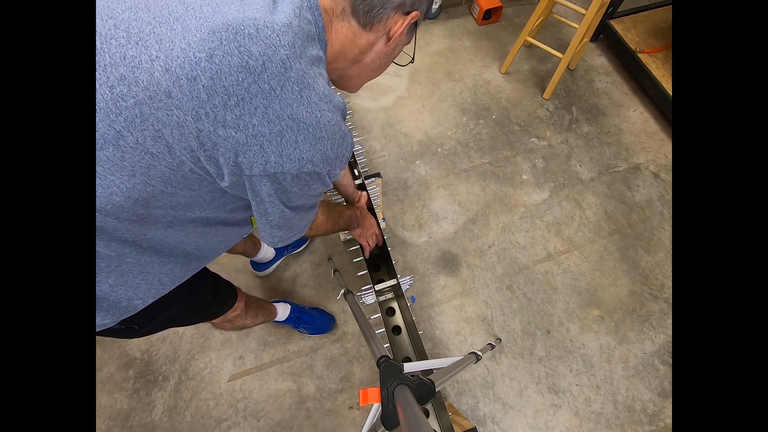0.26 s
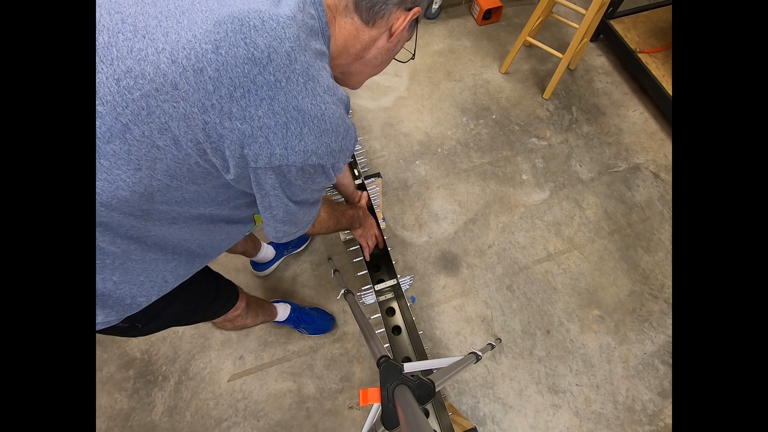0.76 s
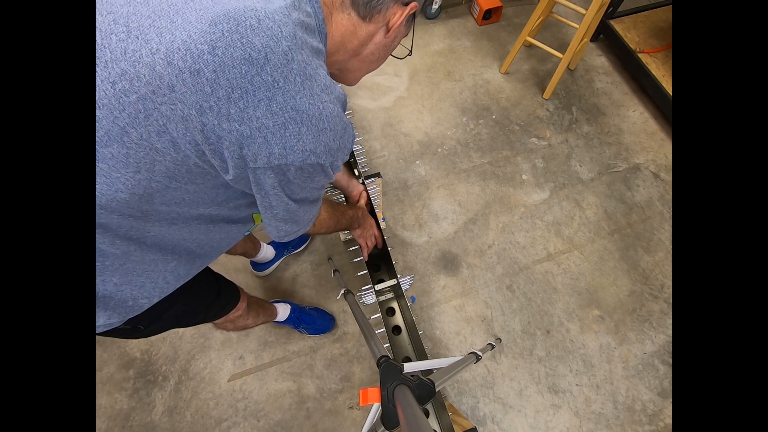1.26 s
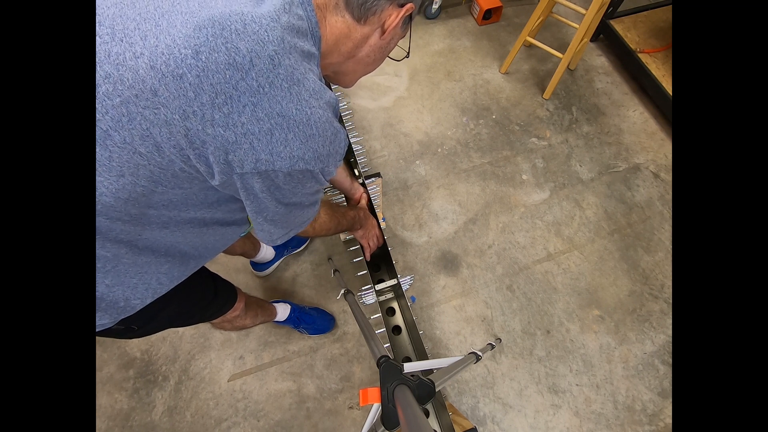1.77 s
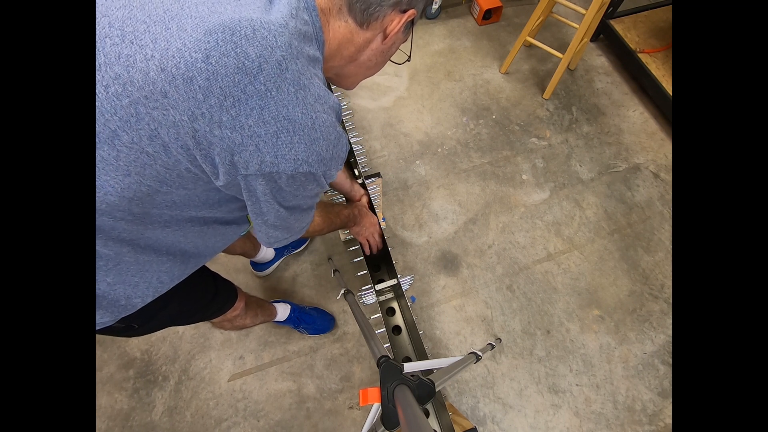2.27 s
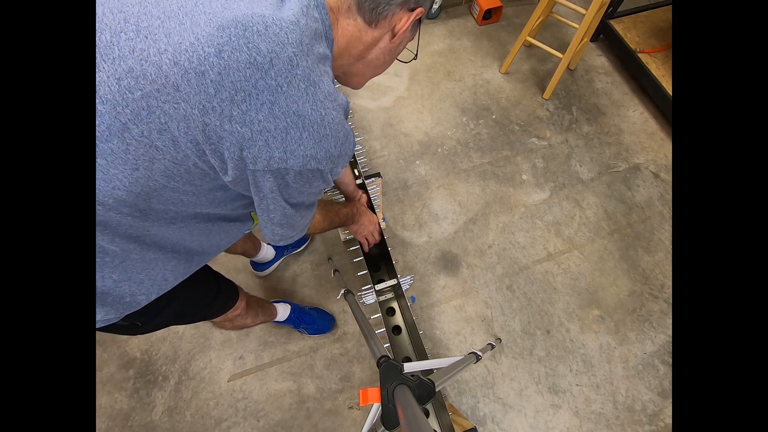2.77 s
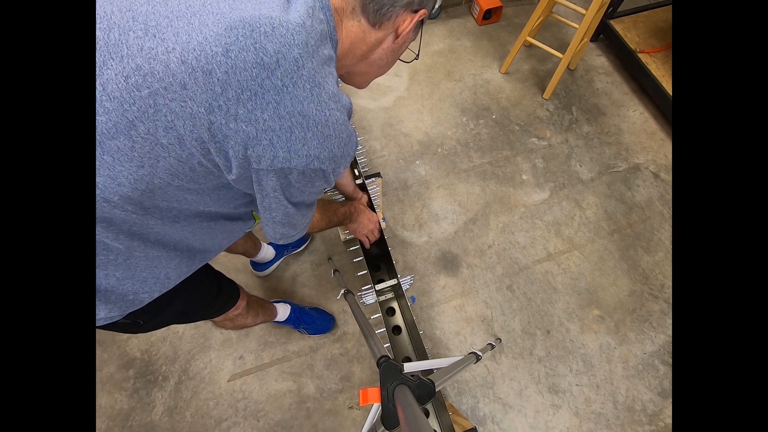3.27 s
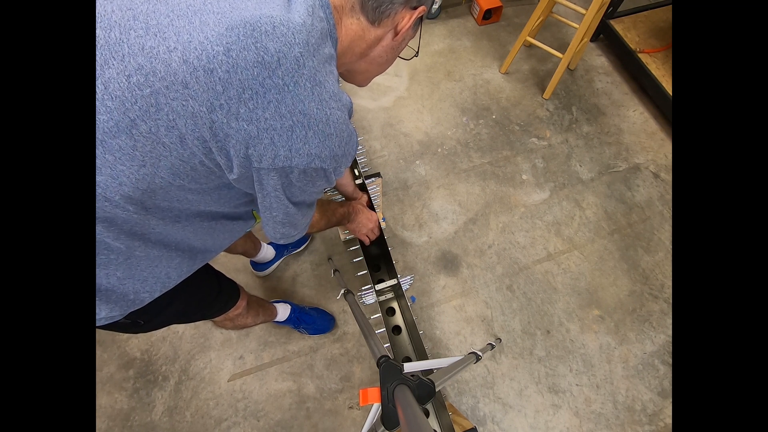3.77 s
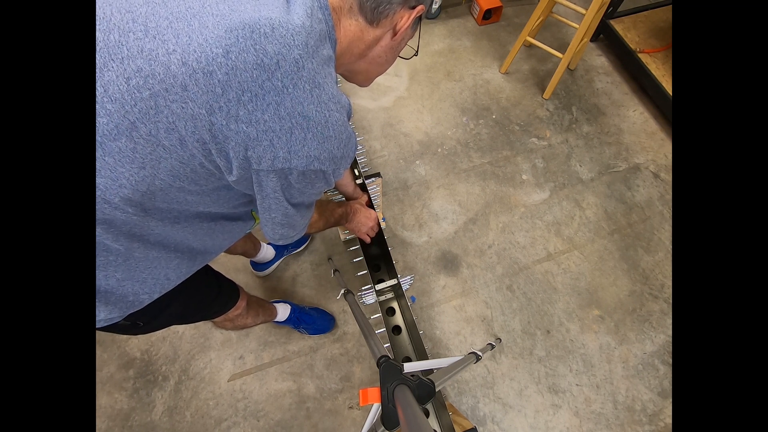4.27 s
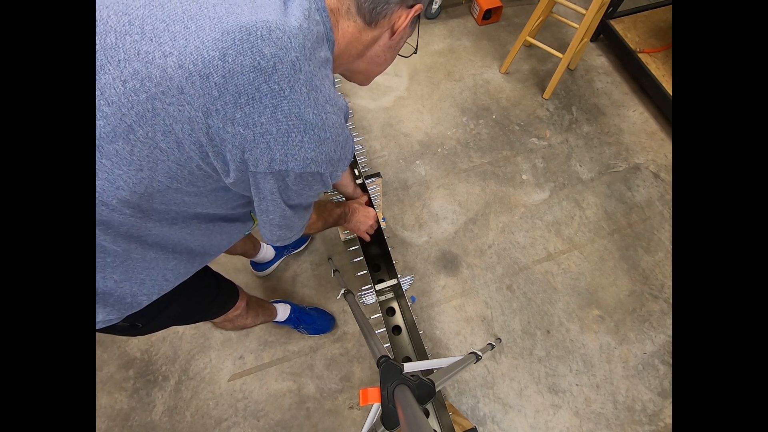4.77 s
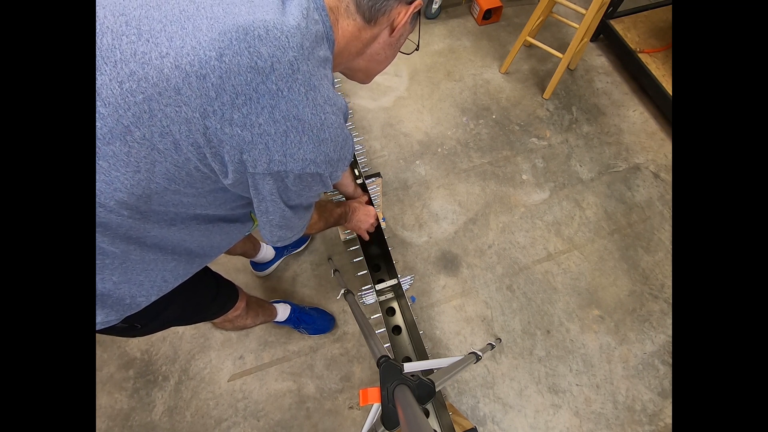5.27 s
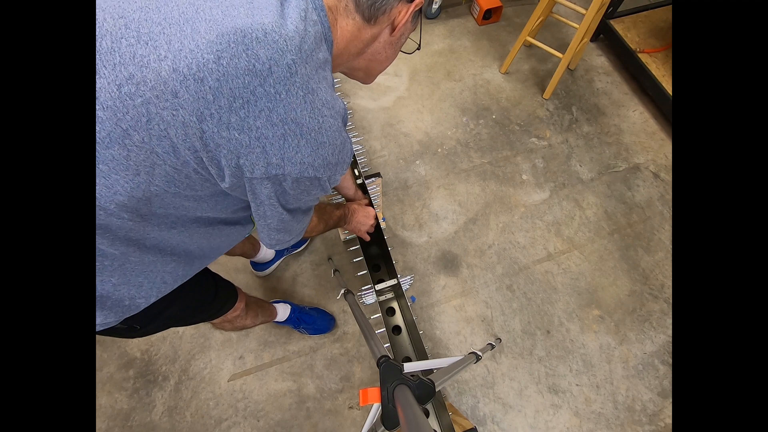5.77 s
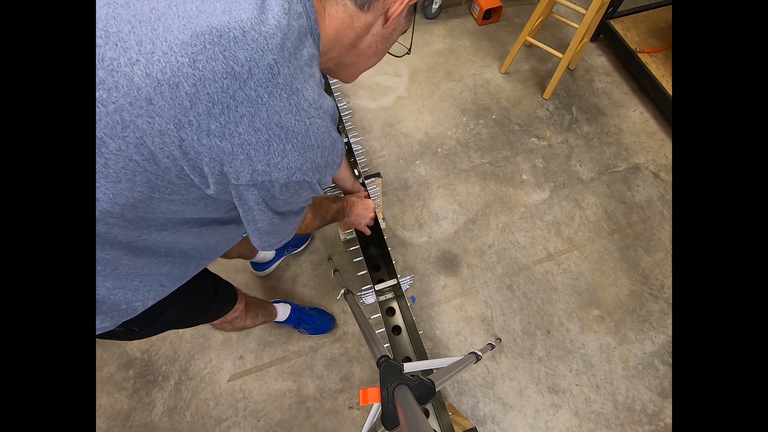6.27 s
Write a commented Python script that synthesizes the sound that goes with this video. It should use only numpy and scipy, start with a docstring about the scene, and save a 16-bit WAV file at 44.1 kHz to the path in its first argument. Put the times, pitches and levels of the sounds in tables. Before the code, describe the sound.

A ventilation fan blows softly throughout, low airy noise with a faint steady hum, in a hard-floored workshop with a short half-second tail. Quiet finger shuffling opens the scene; a barely audible knock and sleeve rustle come at 1.1 seconds. At 1.35 a bright, sharp crack snaps and the aluminium frame answers with a brief hollow thud. A small dry tick follows at 1.9. At 2.54 comes a duller, woodier metallic clack, then a tiny high steel ping at 2.63 and fainter ones near 2.77. From 2.8 to 4 seconds there are soft knocks and fumbling, then near quiet with light handling. At 5.56, two faint bursts lead within milliseconds into the loudest snap, heavy and mid-toned; the background dips slightly afterwards and recovers. Small clicks follow at 5.67 and 5.85, then soft rattles and cloth rustle from 6.2 to the end.

```python
"""A hand riveter worked on a long aluminium frame gives three sharp snaps and some soft knocks: dying
noise rattles that excite the frame's modes and a diffuse tail in a concrete-floored workshop.
Two faint noise bursts come just before the loudest snap; gain control dips the level after it, then recovers.
Small steel parts ping as resonators under tiny contacts; hands shuffle and sleeves rustle as swelling noise.
A ventilation fan hums below as coloured air noise and narrow resonances."""
import sys
import numpy as np
from scipy import signal
from scipy.io import wavfile

SR = 44100
rng = np.random.default_rng(int(sys.argv[2]) if len(sys.argv) > 2 else 0)


def transcribe(signal):
    """Save signal, clipped to [-1, 1], as a 16-bit WAV file at the path in sys.argv[1]."""
    frames = np.atleast_2d(signal).T
    limited = np.clip(frames, -1, 1)
    pcm = np.round(limited * 32767).astype(np.int16)
    wavfile.write(sys.argv[1], SR, pcm)


N = 287973

# Ventilation air noise, spectral density: hz, level_db (per Hz, relative)
FAN_AIR = [(25, -8), (60, -9.5), (130, -8.5), (200, -2.5), (350, -8.5), (530, -8), (740, -9), (950, -11.5),
           (1560, -11), (2900, -18.5), (3600, -28.5), (6000, -28.5), (9500, -46), (12000, -35)]
# Motor lines of the fan: hz, width_hz, level_db
FAN_LINES = [(234, 3.5, -68.5), (347.4, 14, -65), (617, 8.6, -75.5), (726, 10, -74.5), (1425, 12, -79),
             (5650, 150, -94.5), (9350, 8, -96.5)]
# Hand movements: start_s, hold_s, shuffle_db, rustle_db
MOVES = [(0, .01, -60, -84), (1.101, 0.053, -66.5, -62), (1.354, .02, -59, -60), (1.451, 0.4, -61, -78.5),
         (2.375, .05, -65, -71.5), (2.47, 0.025, -53.5, -71.5), (2.7, 0.13, -51.5, -76),
         (3.18, .13, -58.5, -86), (3.75, .05, -64, -84), (3.91, 0.044, -48, -91),
         (4.604, .15, -65.5, -83.5), (5.14, 0.19, -61.5, -89.5), (5.4, .03, -53, -75),
         (5.5, 0.47, -59, -74), (6.182, 0.16, -63.5, -62.5), (6.39, .03, -55.5, -63.5),
         (6.5, .05, -64, -57.5)]
# Low frame resonances under the fingers: hz, width_hz, level_db (relative)
SHUFFLE_MODES = [(152.3, 153.7, -12), (194, 50, -9), (241, 44, -8.5), (365, 29, 5), (492, 140, 1),
                 (763, 220, -10), (1270, 500, -10.5)]
# Cloth and skin noise, spectral density: hz, level_db (per Hz, relative)
RUSTLE_COLOUR = [(710, -29.5), (1200, -8), (1260, -9.5), (1770, 1), (2030, -9), (2880, -3), (9000, -13),
                 (14000, -36)]
# Contacts of small steel parts: start_s, level_db, fade_s (amplitude falls by e)
PINGS = [(0.695, -76, 0.0069), (2.631, -42.5, 0.015), (2.761, -62, 0.028), (2.772, -64, 0.034)]
# Modes of the steel parts: hz, level_db (relative), t60_s
STEEL_MODES = [(4340, -11, .2), (4390, -7.5, .08), (6700, -14, .05)]
# Snaps, knocks, ticks, and two faint noise bursts just before the loudest snap:
# start_s, thud_db, knock_db, knock_hz (centre), crack_db, crack_hz (centre),
# crack_fall_db (per octave above centre), rattle_s (amplitude falls by e), first_contact_db (over the rattle)
BURSTS = [(1.08, -60, -53, 450, -65, 3780, 18, 0.025, -12.5),
          (1.355, -33, -30, 330, -18.5, 4770, 19, 0.011, 2),
          (1.88, -73, -68, 400, -53.5, 2850, 12.5, 0.0027, 3.5),
          (2.539, -56, -31.5, 360, -31, 1970, 6, .013, -9),
          (2.839, -65.5, -56, 450, -65, 2200, 8.5, 0.012, -3),
          (3.342, -76.5, -54.5, 380, -87.5, 3000, 6.5, 0.0083, -15),
          (3.454, -68.5, -51, 450, -71, 1800, 10, .016, -12),
          (3.739, -75.5, -67.5, 600, -71.5, 6040, 15, 0.0047, 0.5),
          (3.852, -63, -53.5, 600, -78, 2500, 12.5, 0.069, -7.5),
          (3.935, -67, -53.5, 360, -82, 2500, 11, 0.0091, -15),
          (5.541, -69, -44, 800, -64, 5000, 3, 0.0087, -2),
          (5.552, -52.5, -33.5, 750, -49.5, 5000, -2, 0.014, -2),
          (5.564, -23, -20, 800, -24, 2400, 4.5, 0.0073, 14),
          (5.67, -55, -41, 900, -39.5, 3000, 10.5, 0.035, -9),
          (5.85, -58, -50, 600, -44, 5070, 3.5, 0.006, -9),
          (6.177, -52.5, -52.5, 850, -64, 2820, 22, 0.037, -5.5),
          (6.215, -46.5, -56, 500, -80, 5500, 9, 0.026, -7),
          (6.394, -63, -58.5, 340, -65.5, 8100, -3, 0.037, -16)]
# Colour of the low thud: hz, level_db (relative)
THUD_COLOUR = [(50, -15.5), (130, -0.5), (220, -3.5), (400, -14), (900, -30.5), (9000, -68.5)]
# Modes of the aluminium frame: hz, level_db (relative), t60_s
FRAME_MODES = [(74, 0, .5), (170.4, -27, .3), (220.4, -15.5, 0.14), (325, 0, 0.35), (498.4, -23.5, 0.12),
               (561, -5, 0.26), (750, -16.5, 0.36), (853, -2.5, .3), (898, -6, 0.26), (1074, -20.5, 1),
               (1194, -5, 0.38), (1700, -5, .12), (1800, -6, .15)]
# Reverberation time of the workshop: hz, t60_s
ROOM_T60 = [(100, 0.45), (260, 0.5), (700, 0.53), (1840, 0.41), (4850, 0.25), (12800, 0.39)]
# Stereo balance: hz, left_minus_right_db
BALANCE_DB = [(350, 0), (1000, -2), (2000, -2), (4000, -1)]
# Left-right correlation of far noise: hz, correlation
FAR_ALIKE = [(60, .6), (180, 0.55), (550, 0.2), (1650, 0.35), (5000, 0.54), (12000, 0.086)]
# Left-right correlation of the bursts and their tail: hz, correlation
TAIL_ALIKE = [(60, .96), (250, .98), (500, .7), (1000, .45), (2500, .55), (8000, .35)]
EDGES_HZ = 25 * 2 ** (np.arange(29) / 3)   # third-octave band edges

FAN_DB = -61
REST_SHUFFLE_DB, REST_RUSTLE_DB = -72, -83
GRIP_DB_PER_S, RELEASE_DB_PER_S = 109.5, 100
KNOCK_BELOW_DB, KNOCK_ABOVE_DB, CRACK_BELOW_DB = 11, 8.5, 4.5   # fall per octave from the centre
CONTACT_SHARE = 0.45   # the opening fades in this share of the rattle length
THUD_LAG_S, THUD_LENGTH_S = 0.006, 0.012   # the stand answers late
FRAME_DB = -16.5
ROOM_DB, ROOM_ONSET_S = 2, 0.003
BASS_CUT_HZ, BASS_LEAK_DB = 110.3, -20.5
TOP_SHELF_HZ, TOP_LEAK_DB, CUTOFF_HZ = 11500, -21.5, 16500
DUCK_START_DB, DUCK_SHARE, RECOVER_DB_S = -37, 0.2, 4   # share: dB of cut per dB of excess
OVERLOAD = 0.95   # full-scale limit of the soft clipping


def from_db(db):
    """Logarithmic level: twenty decibels make a tenfold amplitude."""
    return 10 ** (np.asarray(db) / 20)


def rms_one(x):
    """Normalisation by mean power: scale to unit rms."""
    return x / np.sqrt(np.mean(x ** 2) + 1e-20)


def at_hz(points, hz):
    """Linear interpolation of a table over log frequency."""
    table = np.array(points)
    return np.interp(np.log(hz), np.log(table[:, 0]), table[:, 1])


def band(x, low_hz, high_hz):
    """Causal Butterworth filtering: pass one frequency band."""
    sos = signal.butter(2, [low_hz, high_hz], "band", fs=SR, output="sos")
    return signal.sosfilt(sos, x + 1e-18)


def drift(rate_hz):
    """Low-passed chance: a slow random curve of unit rms from two equal poles."""
    step = 40   # samples between slow values
    pole = np.exp(-2 * np.pi * rate_hz * step / SR)
    white = rng.standard_normal(N // step + 2002)
    slow = signal.lfilter([1], [1, -2 * pole, pole * pole], white)[2000:]   # drop the start-up
    return np.interp(np.arange(N) / step, np.arange(len(slow)), rms_one(slow))


def ring(force, hz, t60):
    """Modal resonance: a unit impulse starts a decaying sine of height 1."""
    radius = from_db(-60 / (t60 * SR))
    angle = 2 * np.pi * hz / SR
    return signal.lfilter([0, np.sin(angle)], [1, -2 * radius * np.cos(angle), radius ** 2], force + 1e-18)


def resonance(x, hz, width_hz):
    """Damping and bandwidth: a wider resonance decays sooner."""
    return ring(x, hz, np.log(1000) / (np.pi * width_hz))


def diffuse(shape, likeness, grit_db=0, size=1):
    """Partly correlated stereo noise: shape(hz) drives bands of size thirds of an octave."""
    white = rng.standard_normal((2, 2, N))
    white = white * from_db(grit_db * rng.standard_normal(N))   # uneven grains
    out = 0
    for k, (low, high) in enumerate(zip(EDGES_HZ[::size], EDGES_HZ[size::size])):
        hz = np.sqrt(low * high)
        mid, side = band(shape(hz) * white[k % 2], low, high)   # neighbouring bands are unrelated
        alike = np.clip(at_hz(likeness, hz), -1, 1)
        lean_db = at_hz(BALANCE_DB, hz) / 2
        pair = np.sqrt(1 + alike) * mid + np.sqrt(1 - alike) * side * [[1], [-1]]
        out = out + pair * from_db([[lean_db], [-lean_db]])
    return out


def fan():
    """Broadband flow noise plus narrow-band resonance: smooth far air and wavering motor lines."""
    air = from_db(FAN_DB) * rms_one(diffuse(lambda hz: from_db(at_hz(FAN_AIR, hz)), FAR_ALIKE))
    white = rng.standard_normal(N)
    lines = sum(from_db(db) * rms_one(resonance(white, hz, width)) for hz, width, db in FAN_LINES)
    return air + lines


def effort(rest_db, peaks_db):
    """Addition of powers: each move swells, holds and fades over a quiet rest; gives a gain."""
    t = np.arange(N) / SR
    power = from_db(2 * rest_db)   # doubled decibels give power
    for (start, hold, *_), peak_db in zip(MOVES, peaks_db):
        grip_db = GRIP_DB_PER_S * np.maximum(start - t, 0)
        release_db = RELEASE_DB_PER_S * np.maximum(t - start - hold, 0)
        power = power + from_db(2 * (peak_db - grip_db - release_db))
    return np.sqrt(power)


def hands():
    """Friction excitation: lumpy finger noise in low frame resonances; cloth and skin rustle above."""
    *_, shuffle_db, rustle_db = np.transpose(MOVES)
    rub = rng.standard_normal(N) * from_db(2.5 * drift(14))
    low = sum(from_db(db) * rms_one(resonance(rub, hz, width)) for hz, width, db in SHUFFLE_MODES)
    shuffle = effort(REST_SHUFFLE_DB, shuffle_db) * rms_one(band(low, 130, 2500))
    cloth = rms_one(diffuse(lambda hz: from_db(at_hz(RUSTLE_COLOUR, hz)), FAR_ALIKE))
    rustle = effort(REST_RUSTLE_DB, rustle_db) * from_db(1.5 * drift(25)) * cloth
    return shuffle + rustle


def pings():
    """Modal excitation by repeated contact: fading runs of tiny touches ring small steel parts."""
    t = np.arange(N) / SR
    force = np.zeros(N)
    for start, db, fade_s in PINGS:
        force += from_db(db) * (t >= start) * np.exp(-np.maximum(t - start, 0) / fade_s)
    force = band(force * rng.standard_normal(N), 3500, 8500)
    # the root offsets the greater build-up of long modes
    return sum(from_db(db) * ring(force, hz, t60) * np.sqrt(100 / (t60 * SR)) for hz, db, t60 in STEEL_MODES)


def hump_db(hz, centre_hz, below_db, above_db):
    """Spectral peak: a level falling by so many dB per octave on either side."""
    octaves = np.log2(hz / centre_hz)
    return -above_db * octaves if octaves > 0 else below_db * octaves


def rattle_power(hz):
    """Exponential decay of power near hz: a rattle opens sharply or swells in softly; a thud follows."""
    power = np.zeros(N + SR // 2)
    t = np.arange(SR // 4) / SR
    thump = t / THUD_LENGTH_S * np.exp(-2 * t / THUD_LENGTH_S) * 2 * np.e   # peak of 1
    for start, thud_db, knock_db, knock_hz, crack_db, crack_hz, fall_db, rattle_s, first_db in BURSTS:
        knock = from_db(knock_db + hump_db(hz, knock_hz, KNOCK_BELOW_DB, KNOCK_ABOVE_DB))
        crack = from_db(crack_db + hump_db(hz, crack_hz, CRACK_BELOW_DB, fall_db))
        fade = np.exp(-2 * t / max(rattle_s, .0005))
        opening = 1 + (from_db(2 * first_db) - 1) * fade ** (1 / CONTACT_SHARE)
        power[round(start * SR):][:len(t)] += (knock ** 2 + crack ** 2) * fade * opening
        thud = from_db(thud_db + at_hz(THUD_COLOUR, hz))
        power[round((start + THUD_LAG_S) * SR):][:len(t)] += thud ** 2 * thump
    return power[:N] * SR / hz   # levels count per octave


def bursts():
    """Noise burst and modal response: a direct, gritty rattle in broad, quick bands also rings the frame."""
    rattle = diffuse(lambda hz: np.sqrt(rattle_power(hz)), TAIL_ALIKE, grit_db=0.5, size=2)
    frame = sum(from_db(db) * ring(rattle, hz, t60) * np.sqrt(20 / (t60 * SR)) for hz, db, t60 in FRAME_MODES)
    return rattle + from_db(FRAME_DB) * frame


def workshop():
    """Reverberant energy storage: bursts fill the room in milliseconds, then decay band by band."""
    fill = np.exp(-1 / (ROOM_ONSET_S * SR))

    def tail(hz):
        """Exponential energy decay: the amplitude of the stored sound near hz."""
        keep = from_db(-120 / (at_hz(ROOM_T60, hz) * SR))   # power falls 60 dB in t60
        stored = signal.lfilter([1 - fill], [1, -fill], rattle_power(hz) + 1e-18)
        return np.sqrt(signal.lfilter([1 - keep], [1, -keep], stored))

    return from_db(ROOM_DB) * diffuse(tail, TAIL_ALIKE)


def scene():
    """Superposition: the work at the frame and its room tail sound over the fan."""
    return fan() + hands() + pings() + bursts() + workshop()


def shelf(x, kind, hz, leak_db):
    """Parallel filtering: a steep cut plus a weak unfiltered leak."""
    cut = signal.sosfilt(signal.cheby2(8, 40, hz, kind, fs=SR, output="sos"), x)
    return cut + from_db(leak_db) * x


def record(dry):
    """Band limits and compression: bass and top are lost, loud sound ducks the gain, peaks are rounded."""
    heard = shelf(dry, "high", BASS_CUT_HZ, BASS_LEAK_DB)
    heard = shelf(heard, "low", TOP_SHELF_HZ, TOP_LEAK_DB)
    power = signal.lfilter([.002], [1, -.998], np.mean(heard ** 2, axis=0))
    level_db = 10 * np.log10(power + 1e-12)
    duck_db = DUCK_SHARE * np.maximum(level_db - DUCK_START_DB, 0)
    ramp_db = RECOVER_DB_S * np.arange(N) / SR
    held_db = np.maximum.accumulate(duck_db + ramp_db) - ramp_db   # instant cut, steady recovery
    rounded = OVERLOAD * np.tanh(heard * from_db(-held_db) / OVERLOAD)
    return signal.sosfilt(signal.cheby2(12, 70, CUTOFF_HZ, fs=SR, output="sos"), rounded)


dry = scene()
out = record(dry)
transcribe(out)
```